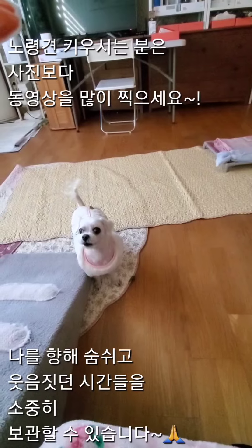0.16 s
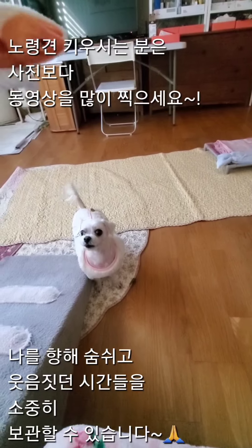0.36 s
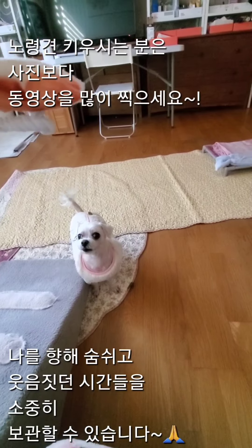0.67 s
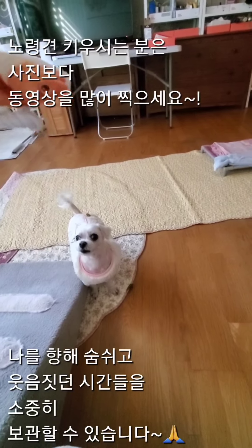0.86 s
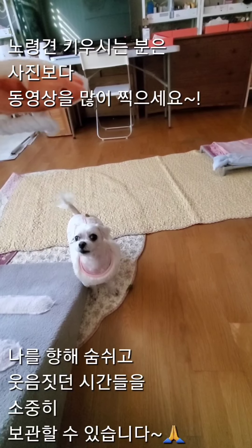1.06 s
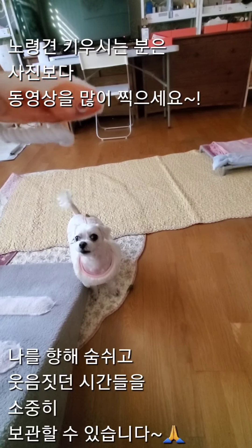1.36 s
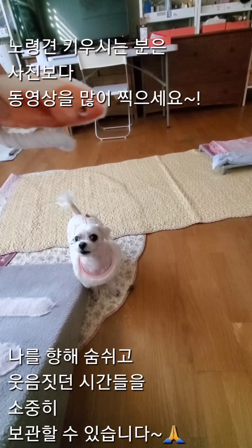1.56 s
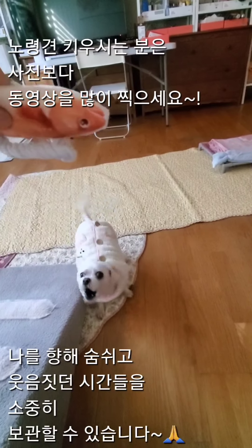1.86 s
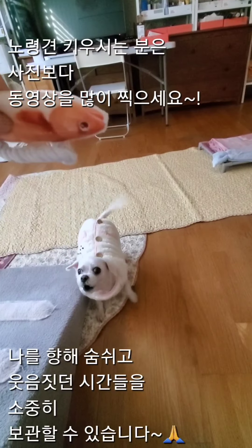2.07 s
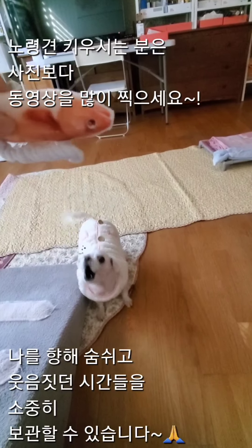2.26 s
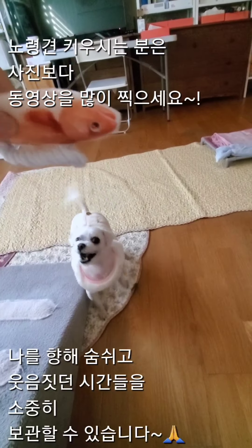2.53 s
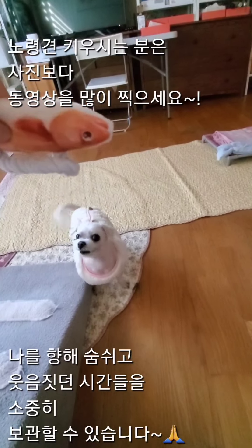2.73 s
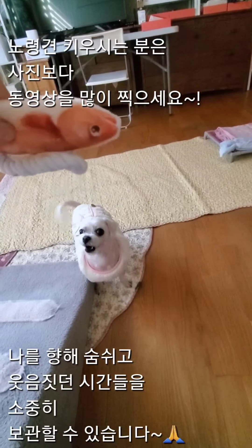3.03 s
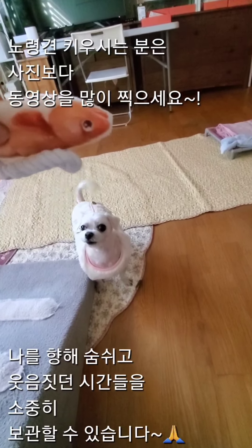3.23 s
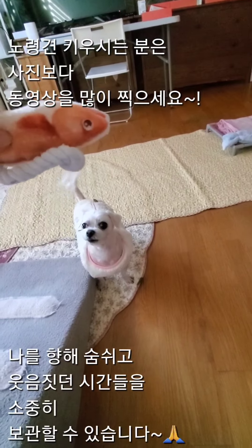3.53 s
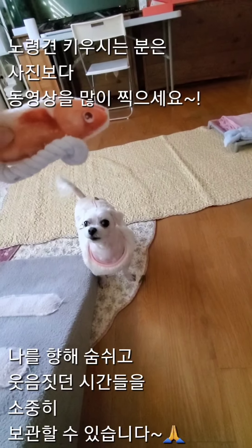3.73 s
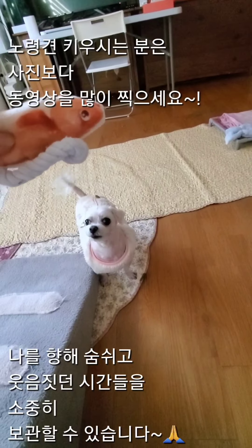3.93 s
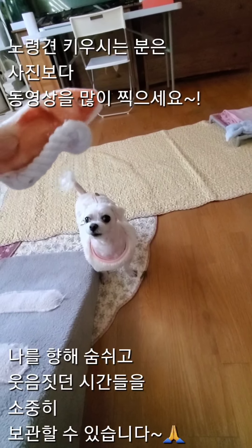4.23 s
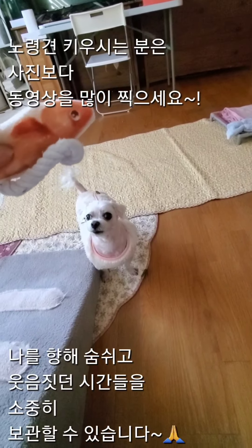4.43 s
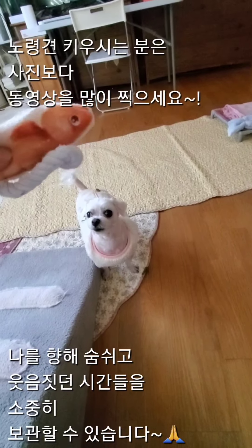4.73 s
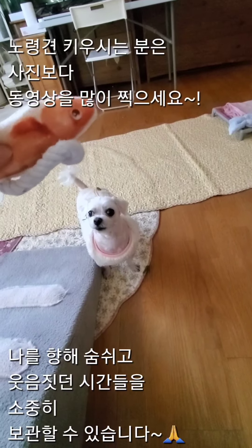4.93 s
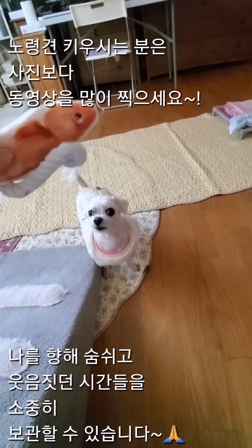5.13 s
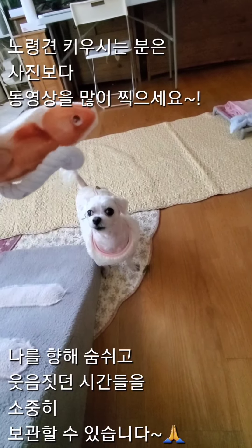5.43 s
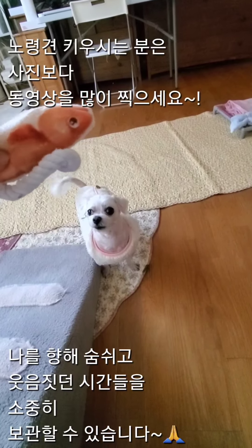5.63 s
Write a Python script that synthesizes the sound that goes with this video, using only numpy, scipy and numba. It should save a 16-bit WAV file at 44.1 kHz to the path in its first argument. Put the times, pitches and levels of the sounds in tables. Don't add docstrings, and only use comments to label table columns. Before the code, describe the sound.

Close on the left, a plush toy is pumped quickly, its reed giving very short bright squeaks alternating with softer, lower ones. Around two seconds a small dog gives two sharp, rough barks, slightly right, ringing in the furnished room. Paws thump and claws click on boards, two lone squeaks follow, then a pause before quick squeak pairs return. A phone microphone captures it in stereo over a faint low fridge hum.

```python
import sys
import numpy as np
from scipy import signal
from scipy.fft import rfft, irfft
from scipy.io import wavfile
from scipy.ndimage import uniform_filter1d
from numba import njit

SR = 44100
rng = np.random.default_rng(int(sys.argv[2]) if len(sys.argv) > 2 else 0)


def materialize(psi):
    bounded = np.clip(np.atleast_2d(psi).T, -1, 1)
    quanta = np.round(bounded * 32767).astype(np.int16)
    wavfile.write(sys.argv[1], SR, quanta)


def how_loud(loudness_db):
    steps = np.asarray(loudness_db, float) / 20
    return 10 ** steps


N = 268833
T = np.arange(N) / SR


def shape(hz, table):
    f, v = np.transpose(table)
    return np.interp(np.log(np.maximum(hz, 1)), np.log(f), v)


def unit(x):
    return x / np.sqrt(np.mean(x ** 2))


def add(out, x, s):
    i = int(s * SR)
    out[..., i:i + x.shape[-1]] += x[..., :N - i]


@njit
def svf(x, hz, width):
    y, b, l = np.empty(len(x)), 0., 0.
    for i in range(len(x)):
        g, k = np.tan(np.pi * hz[i] / SR), width / hz[i]
        v = (b + g * (x[i] - l)) / (1 + g * (g + k))
        b, l, y[i] = 2 * v - b, l + 2 * g * v, k * v
    return y


def band(x, hz, width):
    hz = np.clip(hz + np.zeros(len(x)), 20, .45 * SR)
    return svf(svf(x, hz, 1. * width), hz, 1. * width)


def wobble(size, rate):
    k = max(int(SR / rate), 1)
    return unit(uniform_filter1d(uniform_filter1d(rng.standard_normal(size), k), k))


# frequency_hz, level_db
BLOWN_PARTIALS = [(1200, -7.5), (2500, -5.5), (3700, -12.5), (5000, -15), (6800, -25.5), (8500, -21.5),
                  (10800, -4.5), (12500, -10.5), (14500, -28), (16500, -14)]
# frequency_hz, level_db
SUCKED_PARTIALS = [(830, 0.5), (1700, -1.5), (2550, -2.5), (3400, -7.5), (5200, -9), (6500, -13.5),
                   (7800, -7), (10400, -8), (12500, -14.5), (16500, -31.5)]


def squeak(rows, lead, treble_pan_db):
    rise_s, fall_s = 0.0028, 0.012
    jitter, flutter_db, air_db = 0.0045, 1.5, -17
    s, hz, db, shine_db = np.transpose(rows)
    tube = BLOWN_PARTIALS if hz.mean() > 1e3 else SUCKED_PARTIALS
    orders = np.arange(1, 21)[:, None]
    size = int((s[-1] - s[0] + .03) * SR)
    phase = rng.uniform(0, 1.5, (20, 1))
    flutter = np.array([wobble(size, 120) for _ in orders])
    shake, hiss = wobble(size, 430), rng.standard_normal((2, size))
    ports = []
    for port, side in enumerate((1, -1)):
        lag = lead if side < 0 else 0
        pan_db = side * treble_pan_db / 2
        t = s[0] - .006 + (np.arange(size) - lag) / SR
        late = np.clip((t - s[0]) / (s[-1] - s[0]), 0, 1.5) ** 2
        pitch = np.interp(t, s, hz) * (1 - 7.4 * np.maximum(t - s[-1], 0))
        shaken = pitch * (1 + jitter * (1 + 4.7 * late) * np.roll(shake, int(lag)))
        turn = 2 * np.pi * np.cumsum(shaken) / SR
        f = orders * pitch
        high = np.clip((f - 4000) / 3000, 0, 1)
        treble_db = high * (np.interp(t, s, shine_db) + pan_db)
        gain = how_loud(shape(f, tube) + flutter_db * flutter * (f > 3000) + treble_db)
        tone = (gain * (f < 17500) * np.sin(orders * turn + phase)).sum(0) / 1.124
        puffs = (0.16 + late) * (1 + 0.24 * np.sin(turn))
        air = how_loud(air_db + pan_db) * puffs * unit(band(hiss[port], 10500, 9000))
        edge = np.minimum(t - s[0], 0) / rise_s - np.maximum(t - s[-1], 0) / fall_s
        ports.append((tone + air) * how_loud(np.interp(t, s, db) + 33.7 * edge))
    return np.array(ports)


# time_s, pitch_hz, level_db, shine_db (treble partials)
SQUEAKS = [
    [(0.24, 882, -33, -9), (0.242, 828, -33.5, 1.5), (0.247, 840, -37, -5), (0.252, 809, -35, -1),
     (0.256, 820, -38.5, 1), (0.26, 802, -33, -9)],
    [(0.362, 1119, -38, 7), (0.366, 1161, -20, -2), (0.374, 1197, -25.5, 1), (0.382, 1176, -15.5, -6),
     (0.389, 1101, -35, 3), (0.395, 1066, -23, -10)],
    [(0.504, 850, -30, -1.5), (0.51, 873.6, -29, 1), (0.52, 866.5, -31.5, 2), (0.532, 819, -29, 0),
     (0.542, 774, -39.5, 3.5), (0.55, 777, -33, 0)],
    [(0.693, 1154, -19, -11.5), (0.698, 1184, -24.5, 1), (0.707, 1283, -17, -1.5), (0.717, 1235, -25.5, 3),
     (0.726, 1136, -17, -1.5), (0.733, 1140, -30.5, -5)],
    [(0.842, 861, -29, -11), (0.846, 859, -32, 3.5), (0.854, 829, -35, 5.5), (0.862, 865, -30.5, 4),
     (0.87, 780, -38, -5.5), (0.876, 779, -33, 0.5)],
    [(1.018, 1262, -16.5, -9), (1.022, 1278, -25.5, 5.5), (1.03, 1305, -19, -1.5),
     (1.039, 1278, -18.5, -1.5), (1.047, 1227, -28, 7), (1.053, 1101, -17.5, -10.5)],
    [(1.141, 848, -31, -9), (1.144, 873.6, -27.5, 2.5), (1.15, 831, -35.5, 3.5), (1.156, 849, -28, -5),
     (1.161, 819, -35.5, 5.5), (1.166, 753, -33.5, 1)],
    [(1.287, 1169, -18, -16.5), (1.291, 1155, -27.5, 3.5), (1.298, 1295, -23.5, 1), (1.306, 1244, -21, 1),
     (1.313, 1103, -35, 8.5), (1.319, 1040, -18.5, -11.5)],
    [(1.634, 1227, -26.5, -7), (1.638, 1269, -26, 0.5), (1.645, 1310, -20, 1.5), (1.653, 1360, -14.5, -0.5),
     (1.66, 1199, -27, 6), (1.666, 1098, -18, -12)],
    [(1.758, 894, -28, -7), (1.763, 859, -34, 10), (1.774, 861.4, -27.5, -6), (1.785, 839.6, -34, 10.5),
     (1.795, 779, -37, -1), (1.803, 784, -30, 1.5)],
    [(1.93, 1234, -36, -2), (1.934, 1261, -16.5, -2.5), (1.942, 1309, -20, 1), (1.95, 1270, -20.5, -1.5),
     (1.958, 1210, -22.5, -2), (1.964, 1228, -27.5, -5.5)],
    [(2.073, 830, -36, -10), (2.075, 830, -26.5, 2.5), (2.079, 846.6, -38, 8.5), (2.083, 824, -29, -6),
     (2.087, 829, -34, -0.5), (2.09, 808.6, -30.5, 1.5)],
    [(2.238, 1232, -43, 7), (2.242, 1208, -16, -12.5), (2.248, 1229, -17, -20), (2.256, 1211, -17, -2),
     (2.263, 1320, -23, -1.5), (2.268, 1282, -40.5, 6.5)],
    [(2.402, 816.3, -50, -1), (2.405, 835, -35.5, -1.5), (2.41, 835.6, -41, 5.5), (2.416, 829, -45, -0.5),
     (2.421, 824, -36.5, 2), (2.425, 832, -43, -2)],
    [(2.9, 1148, -35, -11), (2.903, 1146, -26.5, -3.5), (2.909, 1162, -32.5, -0.5), (2.915, 1114, -33, 0.5),
     (2.92, 1095, -34, -17), (2.925, 1078, -28, -11.5)],
    [(3.248, 1191, -38, -10), (3.252, 1153, -29.5, -6), (3.26, 1179, -31, -3), (3.268, 1170, -31.5, -3.5),
     (3.276, 1130, -35.5, -1), (3.282, 1082, -36.5, -1)],
    [(4.493, 1135, -28, -8), (4.497, 1145, -32, -4.5), (4.506, 1158, -24.5, -2), (4.515, 1138, -27, 1.5),
     (4.523, 1096, -31.5, -12), (4.529, 1057, -25, -6)],
    [(4.861, 1190, -24, -8.5), (4.864, 1192, -27.5, -2.5), (4.871, 1212, -22.5, -2.5),
     (4.878, 1197, -25, 1), (4.885, 1158, -26.5, -0.5), (4.89, 1124, -21, -13)],
    [(4.999, 838, -36, -15), (5.002, 856, -28.5, 2.5), (5.008, 823, -38, 1), (5.015, 827, -27, 0),
     (5.021, 779, -41.5, 2), (5.026, 793, -31, -1)],
    [(5.169, 1184, -23, -11), (5.172, 1226, -20.5, -6.5), (5.179, 1247, -21.5, -0.5),
     (5.186, 1267, -32.5, 2), (5.193, 1214, -12.5, -1.5), (5.198, 1209, -36, 5)],
    [(5.289, 823, -37, -8.5), (5.292, 854, -27.5, 2), (5.298, 811, -32, 3), (5.304, 833, -28.5, 4.5),
     (5.309, 776, -39, -12), (5.314, 785, -29.5, -3.5)],
    [(5.457, 1197, -22, -12.5), (5.46, 1180, -23, -1), (5.466, 1210, -21, -3.5), (5.473, 1191, -25.5, 2),
     (5.479, 1165, -30.5, 4.5), (5.484, 1159, -18, -8)],
    [(5.771, 1210, -21, -11.5), (5.774, 1205, -26, -4), (5.78, 1212, -20, -10.5), (5.787, 1170, -18, -4.5),
     (5.792, 1183, -30, 5), (5.797, 1065, -24.5, -2)],
    [(5.889, 846, -37, 3), (5.891, 833, -29, 1), (5.896, 830, -34, 8), (5.901, 807, -29.5, -2),
     (5.905, 791, -36, 4), (5.909, 774, -32.5, -5)],
    [(6.076, 1160, -22, -6), (6.078, 1163, -26.5, -9), (6.081, 1151, -25.5, -11), (6.084, 1162, -28.5, -4),
     (6.087, 1152, -26, -4), (6.089, 1113, -18.5, -15)],
]
# start_s, left_lead_samples, treble_left_minus_right_db
TOY_PLACES = [(0.24, 20, 21.5), (0.366, 27, 12), (0.505, 25, 13.5), (0.694, 17, 15.5), (0.843, 29, 13),
              (1.019, 25, 10), (1.141, 22, 12.5), (1.288, 23, 11), (1.637, 28, 13), (1.76, 20, 12.5),
              (1.931, 16, 9.5), (2.073, 28, 14.5), (2.238, 3, 2.5), (2.402, 13.3, 16), (2.9, 26, 11.5),
              (3.252, 16, 11), (4.497, 14, 9), (4.864, 9.2, 7.5), (4.999, 9.6, 13), (5.17, 12, 11),
              (5.29, 9.0, 13.5), (5.46, 13, 4.5), (5.773, 15, 8.5), (5.89, 12, 14), (6.077, 12, 8)]


def toy():
    out = np.zeros((2, N))
    for rows, (_, lead, pan_db) in zip(SQUEAKS, TOY_PLACES):
        add(out, squeak(rows, lead, pan_db), rows[0][0] - .006)
    return out


# frequency_hz, width_hz, level_db
THROAT = [(716, 120, -6.5), (2200, 420, -21), (3083, 360, -19), (3752, 350, -23.5)]


def bark(rows, folds):
    beat, scatter_db, breath = 0.615, 7.0, 0.6
    s, db, mouth_hz, chest_db, rasp_db = np.transpose(rows)[:5]
    t = np.arange(s[0], s[-1] + .02, 1 / SR)
    fold_s, fold_rates, roughness = np.transpose(folds)
    fold_hz, rough = np.interp(t, fold_s, fold_rates), np.interp(t, fold_s, roughness)
    turns = np.cumsum(fold_hz * (1 + 0.15 * rough * wobble(len(t), 150))) / SR
    cycle, chance = turns.astype(int), rng.standard_normal(100)
    accent = 1 + beat * rough * np.cos(2 * np.pi * cycle / 3)
    size = how_loud(scatter_db * rough * chance[cycle]) * accent
    slaps = size * (np.diff(cycle, prepend=0) > 0)
    gust = size * np.exp(-(turns % 1) / .5) * rng.standard_normal(len(t))
    source = unit(slaps) + breath * rough * unit(gust)
    voice = band(source, np.interp(t, s, mouth_hz), 520)
    for k, (f, width, level_db) in enumerate(THROAT):
        voice = voice + (-1) ** k * how_loud(level_db) * band(source, f, width)
    chest = how_loud(np.interp(t, s, chest_db)) * unit(band(source, fold_hz, 120))
    rasp = how_loud(np.interp(t, s, rasp_db)) * unit(band(gust, 3200, 8200))
    edge = np.clip((t - s[0]) / 0.0049, 0, 1) * np.exp(-np.maximum(t - s[-1], 0) / 0.0027)
    return (unit(voice) + chest + rasp) * how_loud(np.interp(t, s, db) - 2.0) * edge


# time_s, level_db, mouth_hz, chest_db, rasp_db, nominal_fold_hz, nominal_roughness (0-1)
BARKS = [
    [(2.154, -13, 990, -10, -18, 240, 0.5), (2.208, -15, 1374, -27.5, -14, 240, 0.5),
     (2.285, -24.5, 1350, -33.5, -21, 240, 0.5)],
    [(2.562, -24.5, 1286, -5.5, -22, 240, 0.5), (2.604, -10, 1292, -27, -21.5, 240, 0.5),
     (2.69, -23, 1280, -30.5, -28.5, 240, 0.5)],
]
# time_s, fold_rate_hz, roughness (0-1)
FOLDS = [
    [(2.154, 234.1, 0.17), (2.185, 238.2, 0.31), (2.2, 266.5, 0.71), (2.285, 282.3, 0.9)],
    [(2.562, 264.7, 0.7), (2.6, 291, .45), (2.65, 292.9, 0.54), (2.69, 268.3, 0.85)],
]


def barks():
    out = np.zeros(N)
    for rows, folds in zip(BARKS, FOLDS):
        add(out, bark(rows, folds), rows[0][0])
    return out


# start_s, level_db, pitch_hz, decay_s
THUMPS = [(2.959, -39.5, 202.7, 0.037), (2.966, -39.5, 192, 0.05), (2.992, -39.5, 91.5, 0.04),
          (3.01, -42, 122, 0.034)]
# start_s, peak_db, ring_hz, t60_s
TICKS = [(0.6585, -51, 2420, 0.0099), (0.9702, -52, 4780, 0.0096), (1.9167, -34, 2600, 0.0077),
         (2.9642, -39, 4220, 0.012), (2.9858, -27.5, 2400, 0.0066), (3.0053, -36, 2170, 0.011),
         (3.02, -43, 2080, 0.009), (3.0877, -63, 2490, 0.0088), (6.0442, -52.5, 2200, 0.012)]
# start_s, length_s, level_db, centre_hz, width_hz
RUSTLES = [(0.028, 0.032, -69, 2200, 2500), (2.459, 0.067, -52, 4250, 1496),
           (2.757, 0.067, -52, 5400, 1800), (2.941, 0.079, -58, 2640, 5000), (3.407, 0.11, -69, 2200, 3050),
           (4.197, 0.17, -84.5, 1200, 1483), (4.673, 0.046, -74, 9080, 9000)]


def paws_and_fur():
    out, t = np.zeros(N), T[:4096]
    for s, db, hz, t60 in THUMPS:
        add(out, how_loud(db) * np.sin(2 * np.pi * hz * t) * 0.00086 ** (t / t60), s)
    for s, db, hz, t60 in TICKS:
        click = unit(band(rng.standard_normal(len(t)), hz, 6600))
        add(out, how_loud(db + 4) * click * 1e-3 ** (t / t60), s)
    size = N // 20
    for s, length, db, hz, width in RUSTLES:
        grains = rng.standard_normal(size) * how_loud(7.4 * wobble(size, 250))
        stroke = np.sin(np.pi * np.clip(T[:size] / length, 0, 1))
        add(out, how_loud(db) * unit(band(grains, hz, width)) * stroke, s)
    return out


# frequency_hz, t60_s
ROOM_T60 = [(200, 0.44), (1200, 0.51), (4000, 0.27), (12000, 0.26)]


def room(x, wet_db):
    gap_s, alike = 0.0025, 0.48
    t, tail = T[:SR * 3 // 4], 0
    for hz in 150 * 2 ** np.arange(0, 7, .5):
        both, left, right = (svf(rng.standard_normal(len(t)), np.full(len(t), hz), hz / 3) for _ in range(3))
        share = np.clip(alike * (600 / hz) ** 0.52, 0, 1)
        diffuse = share * both + (1 - share) * np.array([left, right])
        tail = tail + diffuse * 0.00041 ** (t / shape(hz, ROOM_T60))
    tail = tail * np.clip(t / gap_s - 1, 0, 1)
    tail = tail / np.sqrt((tail ** 2).sum() / 2)
    return how_loud(wet_db) * signal.fftconvolve(x[None], tail, axes=1)[:, :N]


# time_s, hum_db, air_db
FRIDGE = [(0.0, -58.5, -66), (0.9, -49.5, -61), (2.9, -59.5, -66.5), (3.14, -70, -74), (3.55, -59.5, -72.5),
          (5.31, -50, -62), (6.1, -58.5, -64.5)]
HUM_HZ = 59
# frequency_hz, density_db_per_hz
AIR = [(30, -9.5), (90, 3), (130, -2), (200, -11), (245, -2.5), (290, -13), (360, -2), (440, -13.5),
       (800, -19), (2000, -28.5), (6000, -40.5)]


def fridge():
    s, hum_db, air_db = np.transpose(FRIDGE)
    hum = np.sqrt(2) * np.sin(2 * np.pi * np.cumsum(HUM_HZ + 1.4 * wobble(N, 3)) / SR)
    hum = hum * how_loud(np.interp(T, s, hum_db) + 1.4 * wobble(N, 12))
    density = how_loud(shape(np.arange(N // 2 + 1) * SR / N, AIR))
    mid, side = irfft(rfft(rng.standard_normal((2, N))) * density, N)
    air = unit(mid) + .3 * unit(side) * np.array([[1], [-1]])
    air = air * how_loud(np.interp(T, s, air_db) + 3.0)
    return (hum + air) * how_loud(np.array([[-1.05], [1.05]]))


def scene():
    near, pet = toy(), barks() + paws_and_fur()
    direct = np.array([np.roll(pet, 5) * how_loud(3.2), pet * how_loud(6.5)])
    return near + direct + room(near.mean(0), -14) + room(pet, -3) + fridge()


def band_limit(x):
    return signal.sosfilt(signal.butter(12, 16970, fs=SR, output="sos"), x)


def record(dry):
    low = signal.sosfiltfilt(signal.butter(2, 500, fs=SR, output="sos"), dry)
    high = dry - low
    loud_db = 10 * np.log10(uniform_filter1d((high ** 2).mean(0), 900) + 1e-12)
    gated = low + high * how_loud(-.6 * np.clip(-64 - loud_db, 0, 25))
    top_cut = signal.ellip(8, .2, 30, 15900, fs=SR, output="sos")
    fade_in = np.clip(T / 0.017 - .3, 0, 1)
    return band_limit(signal.sosfilt(top_cut, gated) * fade_in)


dry = scene()
out = record(dry)
materialize(out)
```